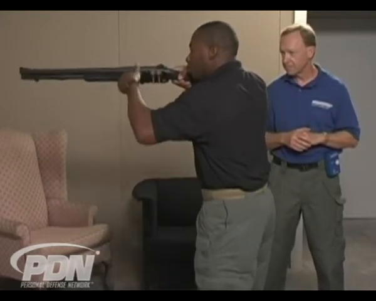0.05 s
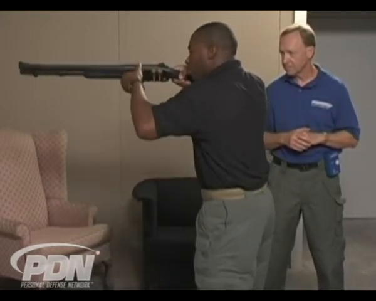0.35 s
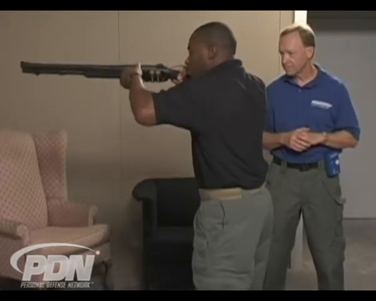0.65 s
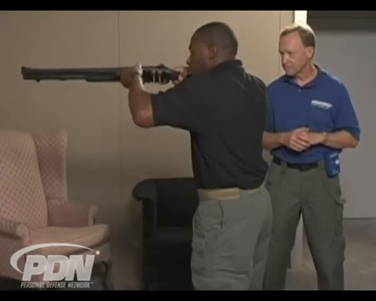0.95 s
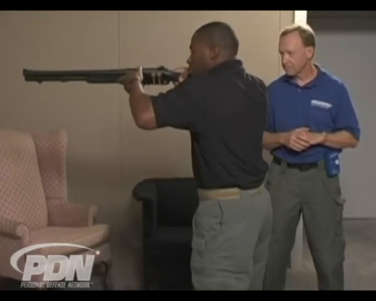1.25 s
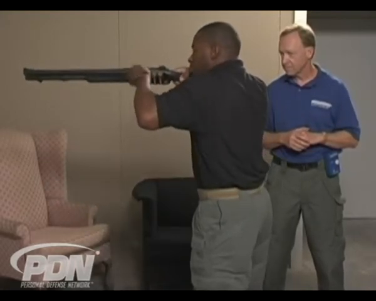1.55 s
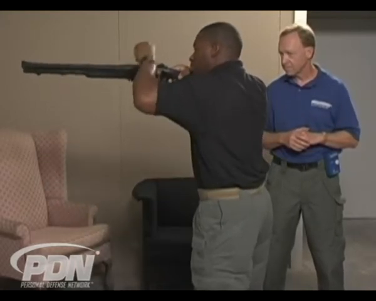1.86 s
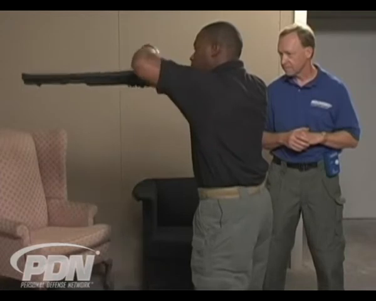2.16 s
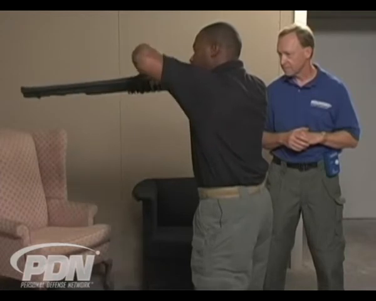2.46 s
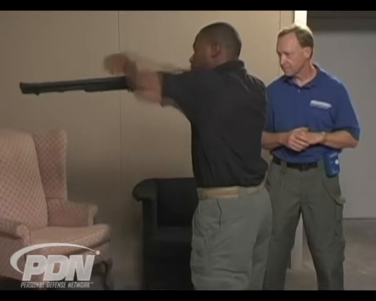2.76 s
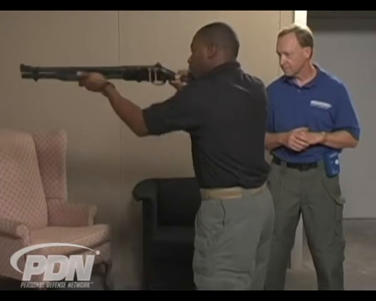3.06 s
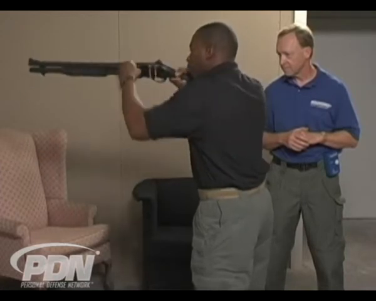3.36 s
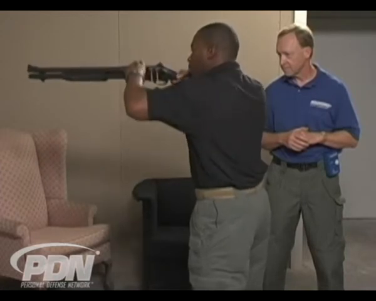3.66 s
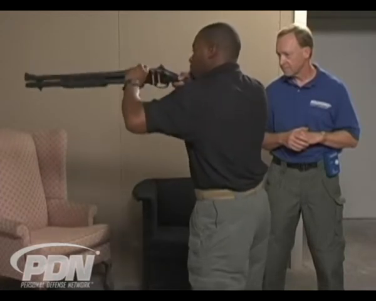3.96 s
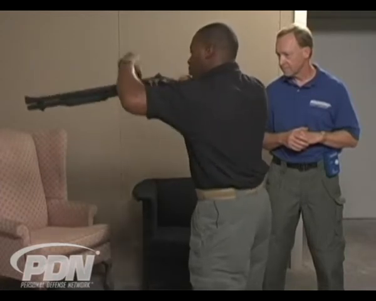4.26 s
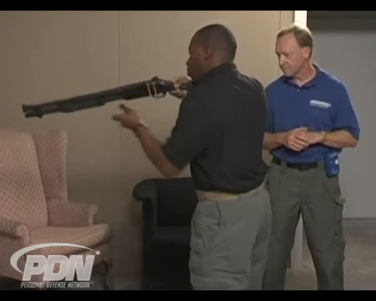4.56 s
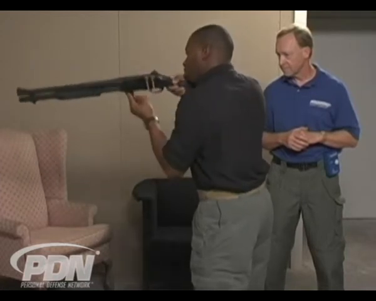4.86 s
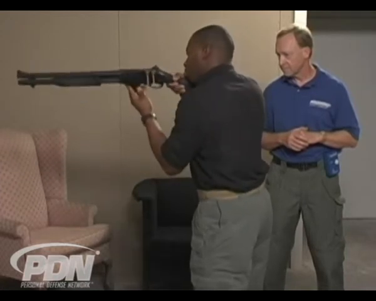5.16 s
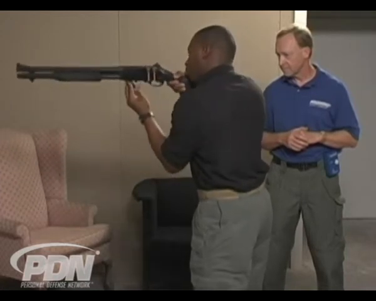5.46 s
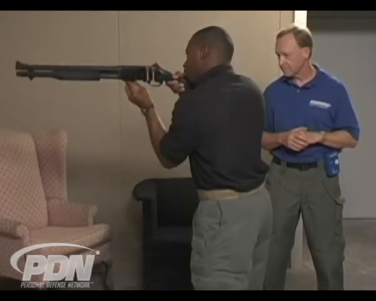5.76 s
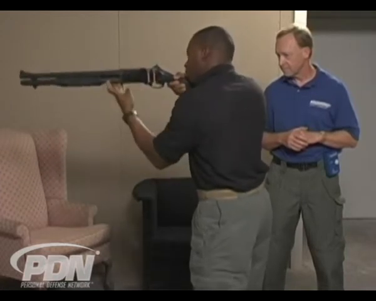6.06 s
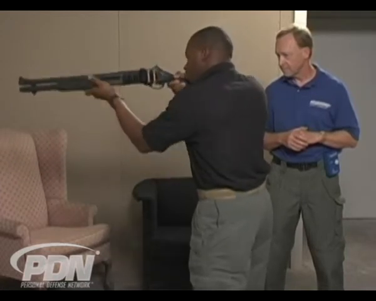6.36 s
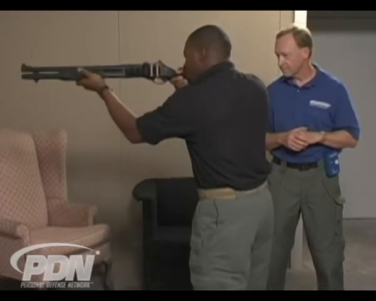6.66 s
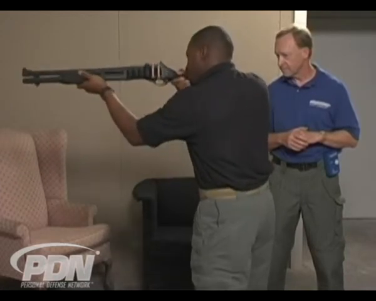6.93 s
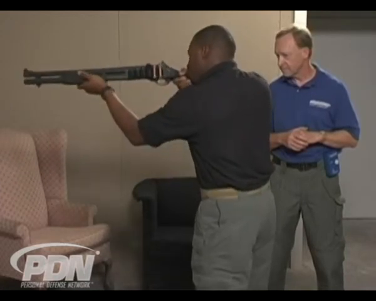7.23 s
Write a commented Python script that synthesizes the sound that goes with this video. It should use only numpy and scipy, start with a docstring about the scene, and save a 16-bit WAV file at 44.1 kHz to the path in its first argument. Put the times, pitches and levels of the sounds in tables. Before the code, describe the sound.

Fingers tap lightly on a pump-action shotgun, then a shell rattles into the open port with small ringing metal clicks. The fore-end slides forward and the bolt slams shut with a loud clack. After a few softer clicks, a second shell scrapes and snaps into the magazine. Faint cloth rustle and ventilation hum lie underneath, and the handling sounds fairly close in a slightly echoing room.

```python
"""Loading a pump-action shotgun

In a large, fairly live room a shell rattles into the open port, the fore-end is run forward and the
bolt slams shut; a second shell is thumbed past the latch into the magazine. Impacts excite the gun's
damped modes and sliding parts sound by stick-slip friction. Cloth rustles; ventilation hums faintly."""
import sys
import numpy as np
from scipy import signal
from scipy.fft import rfft, irfft
from scipy.io import wavfile
from scipy.ndimage import uniform_filter1d

SR = 44100
rng = np.random.default_rng(int(sys.argv[2]) if len(sys.argv) > 2 else 0)


def dump(signal):
    """Clip the signal to [-1, 1] and save it as 16-bit WAV at the path in sys.argv[1]."""
    limited = np.clip(np.atleast_2d(signal).T, -1, 1)
    pcm = np.round(limited * 32767).astype(np.int16)
    wavfile.write(sys.argv[1], SR, pcm)


N = 330440
TIME = np.arange(N) / SR
BLOW_TIME = TIME[:SR // 7]
CUTOFF_HZ = 9350


def from_db(db):
    """Amplitude ratio of a level in decibels."""
    return 10 ** (np.asarray(db) / 20)


def rms_one(x):
    """Normalisation to unit rms."""
    return x / np.sqrt(np.mean(x ** 2) + 1e-20)


def attack_one(x):
    """Normalisation to unit rms over the first 8 ms."""
    return x / np.sqrt(np.mean(x[:SR // 125] ** 2) + 1e-20)


def fade(t, t60):
    """Exponential decay, 60 dB down after t60 seconds."""
    return np.exp(-np.log(1000) * t / t60)


def at_hz(points, hz):
    """Interpolation on a log-frequency axis."""
    points = np.array(points)
    return np.interp(np.log(np.maximum(hz, 1)), np.log(points[:, 0]), points[:, 1])


def coloured(x, spectrum):
    """Spectral shaping below the cutoff, at unit rms."""
    hz = np.fft.rfftfreq(len(x), 1 / SR)
    gain = from_db(at_hz(spectrum, hz)) * (hz < CUTOFF_HZ)
    return rms_one(irfft(rfft(x) * gain, len(x)))


def noise(spectrum, size):
    """Coloured Gaussian noise of unit rms."""
    return coloured(rng.standard_normal(size), spectrum)


def band(x, edges_hz, kind, order=4):
    """Causal Butterworth filtering."""
    return signal.sosfilt(signal.butter(order, edges_hz, kind, fs=SR, output="sos"), x)


def add(out, start_s, sound):
    """Superposition of a sound from start_s onward."""
    start = round(start_s * SR)
    out[start:start + len(sound)] += sound[:N - start]


# spectrum of moving air and hiss: frequency_hz, density_db
AIR_SPECTRUM = [(15, -43.5), (25, -12.5), (85, -6), (134, -8), (168, -4.5), (290, -15), (420, -15),
                (857, -21), (1240, -29), (1480, -25), (2360, -28.5), (9200, -29.5), (12000, -62.5),
                (20200, -120)]
# motor tones: pitch_hz, level_db
MOTOR_TONES = [(120, -79), (166, -76.5)]


def ventilation():
    """Airflow gives broadband noise, and the motor adds steady pure tones."""
    hum = sum(np.sqrt(2) * from_db(db) * np.sin(2 * np.pi * hz * TIME + rng.uniform(0, 2 * np.pi))
              for hz, db in MOTOR_TONES)
    return from_db(-70) * noise(AIR_SPECTRUM, N) + hum


# movements of the arm: centre_s, half_length_s, level_db
ARM_GESTURES = [(1.05, .25, -70.5), (1.68, .22, -67), (2.3, .35, -69), (4.6, .6, -73), (6.05, .6, -66)]


def arm_motion():
    """Amplitude envelope of the arm's movement, one Gaussian swell per gesture."""
    return sum(from_db(db) * np.exp(-((TIME - s) / half_s) ** 2) for s, half_s, db in ARM_GESTURES)


# spectrum of brushing cloth: frequency_hz, density_db
CLOTH_SPECTRUM = [(100, -6), (500, -0.5), (1200, 0), (2500, -6), (6000, -12.5), (9000, -15.5)]


def rustle(still_db=-82, rumble_db=-1.0):
    """Cloth friction is noise modulated in uneven patches; a low handling rumble follows the arm."""
    motion = arm_motion()
    patches = rms_one(uniform_filter1d(rng.standard_normal(N), size=900))
    envelope = np.hypot(from_db(still_db), motion) * from_db(2.5 * patches)
    cloth = noise(CLOTH_SPECTRUM, N)
    rumble = rms_one(band(rng.standard_normal(N), [50, 200], "band"))
    return envelope * cloth + from_db(rumble_db) * motion * rumble


def ringing(modes, favoured_hz, focus_db, focus_width, detune):
    """Modal synthesis: the contact point favours modes near one frequency; the grip detunes them."""
    hz, db, t60 = np.transpose(modes)[:, :, None]
    near = np.exp(-(np.log(hz / favoured_hz) / focus_width) ** 2)
    strength = from_db(db + focus_db * near + 2 * rng.standard_normal(hz.shape))
    polarity = rng.choice([-1, 1], hz.shape)
    hz = hz * (1 + detune * rng.standard_normal(hz.shape))
    partials = strength * polarity * np.sin(2 * np.pi * hz * BLOW_TIME) * fade(BLOW_TIME, t60)
    return attack_one(partials.sum(axis=0))


# the dense, short-lived modes of the whole gun: frequency_hz, density_db
GUN_SPECTRUM = [(25, -26), (90, -11), (250, -8), (370, -7.5), (520, -3), (850, -3), (1150, 2.5), (2000, -4),
                (3000, -2.5), (4300, -7), (6500, -5), (9300, -11)]
# modes of receiver, barrel and shell case: pitch_hz, level_db, t60_s
BODY_RESONANCES = [(500, -5, .045), (710.9, -7, .055), (981.3, -4, .03), (1085, -2, 0.044),
                   (1290, -1, 0.034), (1489, -2, .045), (1712.4, -4, .05), (1977.3, -7, .04),
                   (2356.9, -3.5, .03), (2670.2, -6, .04), (3110, -8, .035), (3443, -9, .03)]
# modes of the carrier, latches and small steel parts: pitch_hz, level_db, t60_s
STEEL_RESONANCES = [(5237.4, -5, .08), (5370, -3.5, .09), (5613, -6.5, .12), (6195, 0, .08),
                    (6440, -3, 0.11), (6767, -1, .055), (6842, -2, 0.062)]


def blow(middle_db, treble_db, knock_hz, steel_hz, ring_db, crack_t60):
    """An impact gives a crack, then free vibration; middle and treble are set against the low band."""
    low_top_hz, treble_from_hz = 1800, 3900
    envelope = fade(BLOW_TIME, crack_t60) + from_db(-11) * fade(BLOW_TIME, t60=0.082)
    crack = attack_one(noise(GUN_SPECTRUM, len(BLOW_TIME)) * envelope)
    body = ringing(BODY_RESONANCES, knock_hz, focus_db=8.5, focus_width=0.12, detune=.015)
    steel = ringing(STEEL_RESONANCES, steel_hz, focus_db=11.0, focus_width=0.017, detune=.009)
    struck = crack + body
    low = attack_one(band(struck, low_top_hz, "low"))
    middle = attack_one(band(struck, [low_top_hz, treble_from_hz], "band"))
    crack_treble = attack_one(band(crack, treble_from_hz, "high"))
    high = attack_one(crack_treble + from_db(ring_db - 4) * steel)
    return low + from_db(middle_db) * middle + from_db(treble_db) * high


# fingers touching the gun and the shells: start_s, peak_db
FINGER_TAPS = [(0.054, -54), (0.375, -54), (0.837, -47.5), (0.861, -48), (0.932, -44), (1.067, -47),
               (1.148, -46.5), (1.262, -53), (1.491, -45.5), (1.54, -50), (1.606, -47), (1.685, -52),
               (3.534, -52), (3.65, -46.5), (3.838, -47), (4.107, -52), (4.153, -51), (4.829, -50),
               (5.219, -49), (5.52, -43), (6.225, -40), (6.406, -42)]


def taps(faint_per_s=2.0, over_rustle_db=14.0, treble_db=-7.5, crest_db=5.0):
    """Soft impacts rise slowly and the loose shell rebounds; faint random ones scale with arm motion."""
    out = np.zeros(N)
    swell = 1 - fade(BLOW_TIME, t60=0.05)
    motion_db = 20 * np.log10(arm_motion() + 1e-9)
    faint_samples = rng.integers(0, N, round(faint_per_s * N / SR))
    faint = [(TIME[i], motion_db[i] + over_rustle_db) for i in faint_samples]
    for start_s, peak_db in FINGER_TAPS + faint:
        knock_hz = rng.choice([1085, 2400])
        hit = blow(treble_db / 4, treble_db, knock_hz, steel_hz=6330, ring_db=-3.0, crack_t60=0.0177)
        for bounce in range(3):
            delay_s = bounce * rng.uniform(.006, .013)
            add(out, start_s + delay_s, from_db(peak_db - crest_db - 8 * bounce) * swell * hit)
    return out


# shell, bolt and latch striking the receiver: start_s, level_db, middle_db, treble_db, knock_hz
RECEIVER_IMPACTS = [(1.82, -45, -2, -14, 1480), (1.824, -38.5, -11, -16, 1460),
                    (1.84, -41.5, -10, -12, 1480), (2.042, -42, -5, -1, 1480), (2.066, -43, -7, -6, 1390),
                    (2.088, -42.5, -6, -15, 1340), (2.141, -40.5, -10, -18, 1740),
                    (2.187, -43, -13, -10, 1685), (2.381, -41, -2, 1.5, 2340), (2.398, -47, 9, -2, 2350),
                    (2.403, -37.5, -7, -3.5, 980), (2.479, -46, -3, 3, 1000), (2.507, -29, -15, -6, 990),
                    (2.512, -32, -14, -12, 1035), (2.529, -34, -11, -16, 1070), (2.553, -33, -9, -7, 990),
                    (2.572, -44, -1, -3, 1340), (2.608, -38.5, -12, -11, 1260), (2.721, -39.5, -2, 3, 984),
                    (2.7595, -37.5, 5, -2, 1985), (2.77, -37.5, 1, -3, 1920), (2.92, -35, -12, -17, 1100),
                    (2.9635, -34, 2, -5, 2000), (2.996, -32, 4.5, 14, 2600), (3.0064, -26, 4.5, 11.5, 2600),
                    (3.0423, -16.5, 0, 4.5, 981), (3.049, -18, -3, 0.5, 1040), (4.2622, -44, 10, 5, 2350),
                    (4.2643, -33.5, 0, -1.5, 2350), (4.626, -35, -5, -7, 1117), (4.718, -49, -6, 1, 1110),
                    (4.743, -39.5, -18, -19, 1037), (4.912, -49, -10, -19, 1030),
                    (5.047, -54, -1, -1, 1350), (5.056, -37.5, -2.5, -6, 1358), (5.119, -51, -4, -6, 1060),
                    (5.682, -35.5, -6, -5, 950), (5.712, -41.5, -7, -6, 978), (5.859, -24.5, -3, 0.5, 1302),
                    (5.9206, -26.5, -4, -4, 1290), (5.994, -26, -12, -9, 1175),
                    (6.009, -29, -17, -17, 1000), (6.035, -31, -5, -4.5, 1110), (6.17, -40, -3, -6, 1080),
                    (6.279, -36, -15, -22, 977), (6.309, -32, -6, -12, 1090)]


def receiver_impacts():
    """Impact excitation: each contact has its own brightness and, with the port open, the brighter ones ring
    the loose carrier more."""
    out = np.zeros(N)
    closing_s, _, shut_s, _, _ = FORE_END_STROKE
    for start_s, level_db, middle_db, treble_db, knock_hz in RECEIVER_IMPACTS:
        port_open, bolt_shut = start_s < closing_s, start_s > shut_s
        # once the action is closed, only the latches ring a little
        steel_hz = (5330 if bolt_shut else 6760) * (1 + .012 * rng.standard_normal())
        ring_db = 9.5 + .5 * treble_db if port_open else -5.0
        hit = blow(middle_db, treble_db, knock_hz, steel_hz, ring_db, crack_t60=.013)
        # the dull plastic hull builds up force more slowly than steel on steel
        hit *= 1 - fade(BLOW_TIME, t60=.007 * from_db(-treble_db / 2))
        # only heavy blows move the whole gun and carry bass; a loose shell never does
        weight = 0 if port_open else np.interp(level_db, [-37, -25], [0, 1])
        hit = band(hit, 630 - 530 * weight, "high", order=2)
        add(out, start_s, from_db(level_db) * (hit + weight * from_db(-23.5) * thud()))
    return out


def friction(stroke, modes, favoured_hz, modes_db, slips_per_s, grain_db, lowest_hz):
    """Stick-slip: tiny slips click and ring the part. Stroke rows are time_s, level_db, treble_db."""
    times_s, level_db, treble_db = np.transpose(stroke)
    t = np.arange(times_s[0], times_s[-1], 1 / SR)
    sizes = from_db(grain_db * np.minimum(rng.exponential(1, len(t)), 4))
    polarity = rng.choice([-1, 1], len(t))
    slips = sizes * polarity * (rng.random(len(t)) < slips_per_s / SR)
    response = ringing(modes, favoured_hz, focus_db=6.0, focus_width=.07, detune=0)
    rings = signal.fftconvolve(slips, response)[:len(t)]
    rub = coloured(slips, GUN_SPECTRUM) + from_db(modes_db) * rms_one(rings)
    low = rms_one(band(rub, [lowest_hz, 2100], "band"))
    high = rms_one(band(rub, 2100, "high"))
    bright = from_db(np.interp(t, times_s, treble_db))
    envelope = from_db(np.interp(t, times_s, level_db))
    out = np.zeros(N)
    add(out, times_s[0], envelope * (low + bright * high) / np.hypot(1, bright))
    return out


# shell or hand rubbing on the gun: seated_s, push_length_s, level_db, treble_db
SHORT_RUBS = [(2.10, .06, -49, -7), (2.2, .03, -52, -5), (2.73, .02, -46, 0), (4.255, .045, -54, -1),
              (4.731, .028, -43, -10), (5.40, .06, -50.5, -11), (5.62, .06, -48, -16),
              (5.688, .018, -34, -7), (5.85, .025, -36, 4), (5.905, .04, -39, 11), (5.992, .025, -41, -6),
              (6.048, .04, -41, 0), (6.315, .04, -38, -6)]


def rubs(swell_db=17.0, t60_s=.15):
    """Friction swells until the part seats, then decays; firmer pressure reaches lower frequencies."""
    out = np.zeros(N)
    for seated_s, length_s, level_db, treble_db in SHORT_RUBS:
        stroke = [(seated_s - length_s, level_db - swell_db, treble_db),
                  (seated_s, level_db, treble_db),
                  (seated_s + t60_s, level_db - 60, treble_db)]
        out += friction(stroke, BODY_RESONANCES, favoured_hz=1050, modes_db=-6.5, slips_per_s=1900,
                        grain_db=3.0, lowest_hz=np.interp(level_db, [-48, -37], [600, 130]))
    return out


# thin steel parts ringing on after a hit: start_s, pitch_hz, level_db, t60_s
STEEL_PINGS = [(2.5075, 6740, -32, .09), (2.5535, 5360, -40, .2), (2.7215, 6240, -38, .12),
               (4.264, 5220, -48, .55), (4.264, 6430, -37, .1), (4.626, 1480, -44, .22)]


def pings():
    """Beating: a thin part vibrates freely in two modes of nearly equal frequency."""
    out, t = np.zeros(N), TIME[:SR]
    for start_s, pitch_hz, level_db, t60_s in STEEL_PINGS:
        beat_hz = rng.uniform(15, 30)
        pair = np.sin(2 * np.pi * pitch_hz * t) + .5 * np.sin(2 * np.pi * (pitch_hz + beat_hz) * t)
        add(out, start_s, from_db(level_db) * pair * fade(t, t60_s))
    return out


def long_stroke(start_s, run_up_s, stop_s, level_db, treble_db, stop_t60_s=.035):
    """Friction grows louder and brighter with sliding speed, holds, then stops abruptly."""
    slow_treble_db = treble_db - 9.0
    return [(start_s, level_db - 30.0, slow_treble_db),
            (start_s + run_up_s, level_db, treble_db),
            (stop_s, level_db, treble_db),
            (stop_s + stop_t60_s, level_db - 60, slow_treble_db)]


# forward travel of the fore-end: start_s, run_up_s, stop_s, level_db, treble_db
FORE_END_STROKE = (2.912, .083, 3.054, -21.5, 6.0)


def fore_end():
    """Sliding friction of the action bars in their tracks drives the steel modes until the bolt shuts."""
    return friction(long_stroke(*FORE_END_STROKE), STEEL_RESONANCES, favoured_hz=6940, modes_db=-7.0,
                    slips_per_s=3400, grain_db=3.5, lowest_hz=190)


def thud():
    """Rigid-body recoil of the gun against shoulder and hands gives a damped low-frequency pulse."""
    bass = band(rng.standard_normal(len(BLOW_TIME)), [45, 240], "band")
    return attack_one(bass * fade(BLOW_TIME, t60=0.072))


# travel of the second shell's rim along the latch: start_s, run_up_s, stop_s, level_db, treble_db
RIM_STROKE = (5.745, .042, 5.865, -37, 10.0)
# modes of the brass rim on the latch: pitch_hz, level_db, t60_s
RIM_RESONANCES = [(1050, 8.5, .03), (3380, 1.5, .025), (6310, 3.5, .02), (6760, 3, .035)]


def rim_scrape():
    """Stick-slip of the brass rim over the latch excites a few strongly damped modes."""
    return friction(long_stroke(*RIM_STROKE), RIM_RESONANCES, favoured_hz=7500, modes_db=3.0,
                    slips_per_s=3000, grain_db=-1.0, lowest_hz=550)


# reverberation time of the room: frequency_hz, t60_s
TAIL_DECAY = [(100, 0.0041), (500, 0.2459), (1400, 0.4295), (4000, 0.5647), (9000, 0.5444)]
# spectrum of the reverberant tail: frequency_hz, level_db
TAIL_SPECTRUM = [(100, -5.5), (500, -0.5), (1200, -3), (3000, -3), (6000, -1), (9000, -1.5)]


def room(x, early_db, late_db, early_t60, first_echo_s):
    """Reverberation: early reflections from shooter and floor, then a diffuse tail decaying by band."""
    t = TIME[:SR]
    edges = np.geomspace(60, CUTOFF_HZ, num=9)
    tail = np.zeros(SR)
    for low, high in zip(edges, edges[1:]):
        centre_hz = np.sqrt(low * high)
        diffuse = band(rng.standard_normal(SR), [low, high], "band")
        tail += diffuse * from_db(at_hz(TAIL_SPECTRUM, centre_hz)) * fade(t, at_hz(TAIL_DECAY, centre_hz))
    tail *= 1 - fade(t, t60=0.027)
    early = band(rng.standard_normal(SR), CUTOFF_HZ, "low") * fade(t, early_t60) * (t > first_echo_s)
    response = from_db(early_db) * early / np.linalg.norm(early)
    response += from_db(late_db) * tail / np.linalg.norm(tail)
    return signal.fftconvolve(x, response)[:N]


def scene():
    """Superposition of the gun's direct sound, its reverberation and the background, in mono."""
    gun = receiver_impacts() + taps() + rubs() + fore_end() + rim_scrape()
    echoes = room(gun, early_db=-13.0, late_db=-15.5, early_t60=.12, first_echo_s=0.0054)
    return (gun + pings() + echoes + rustle() + ventilation())[None]


def record(dry):
    """Soft saturation rounds the loudest peaks, and a steep low-pass filter limits the bandwidth."""
    rounded = 1.2 * np.tanh(dry / 1.2)
    return signal.sosfilt(signal.ellip(12, .1, 90, CUTOFF_HZ, fs=SR, output="sos"), rounded)


dry = scene()
out = record(dry)
dump(out)
```